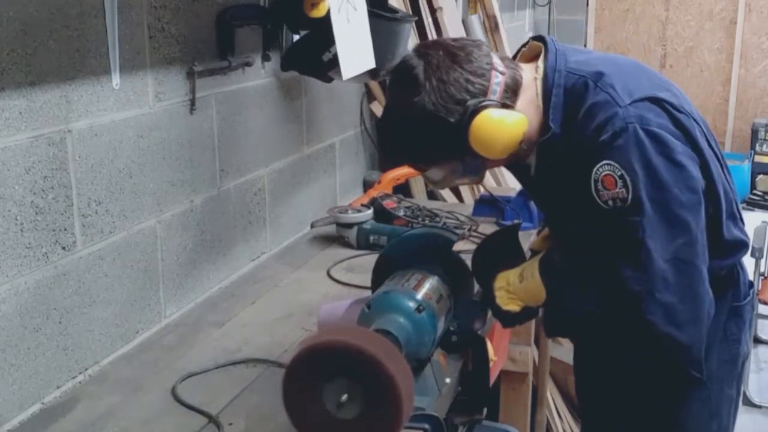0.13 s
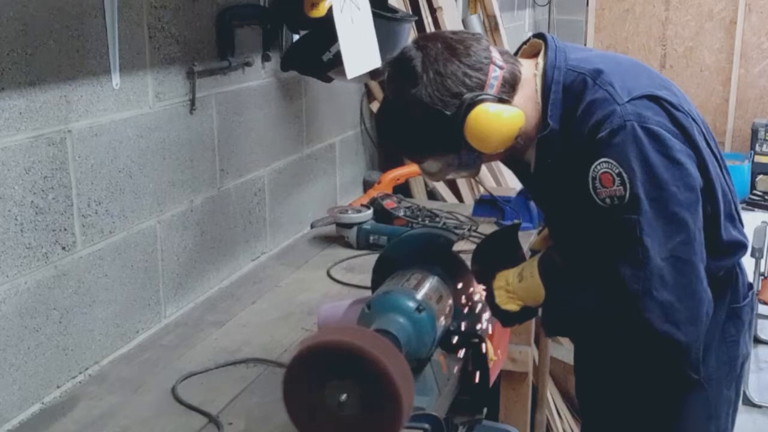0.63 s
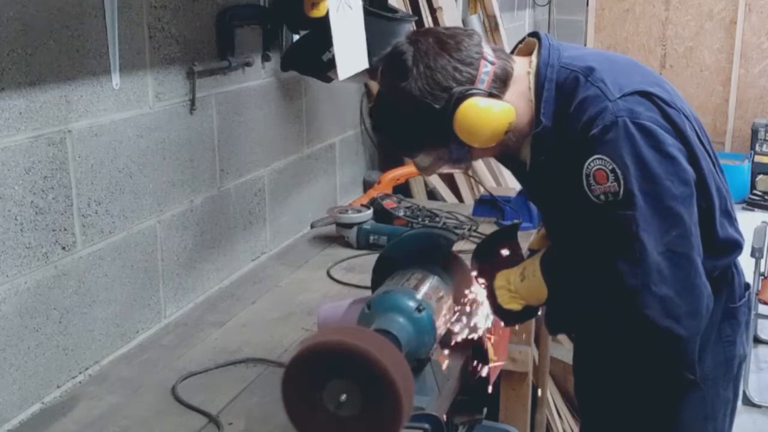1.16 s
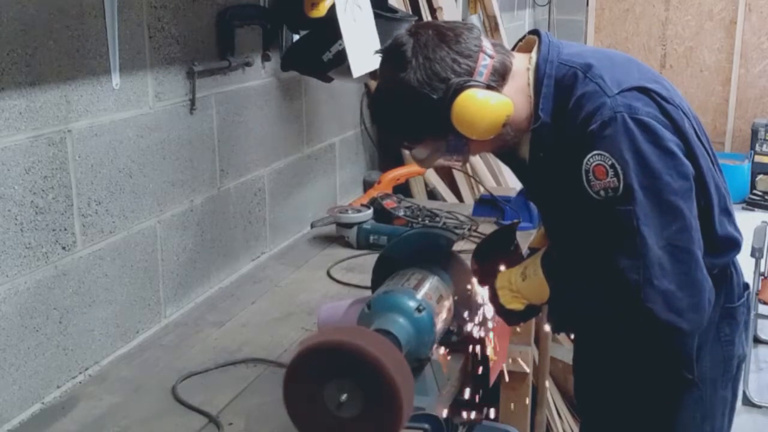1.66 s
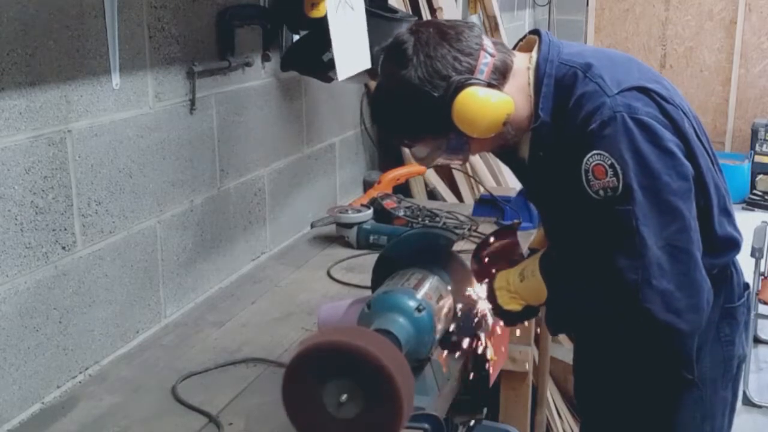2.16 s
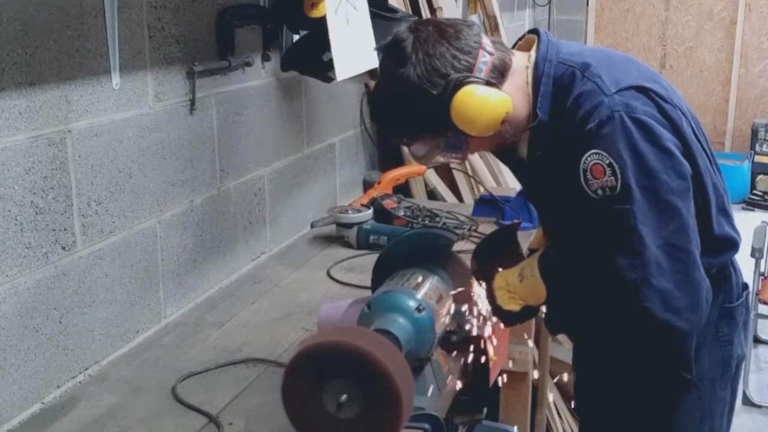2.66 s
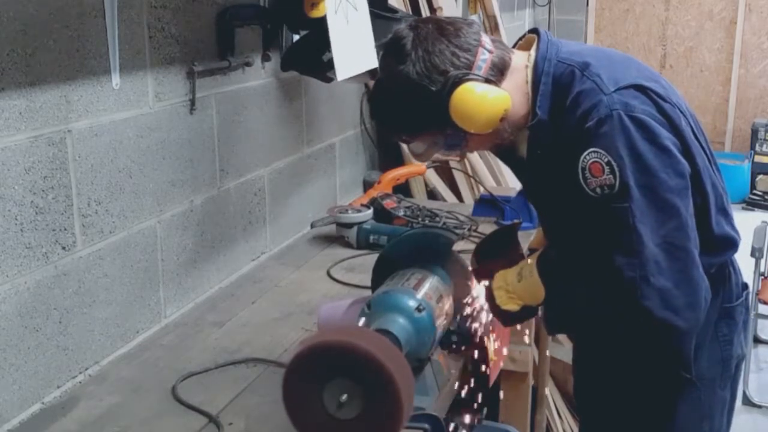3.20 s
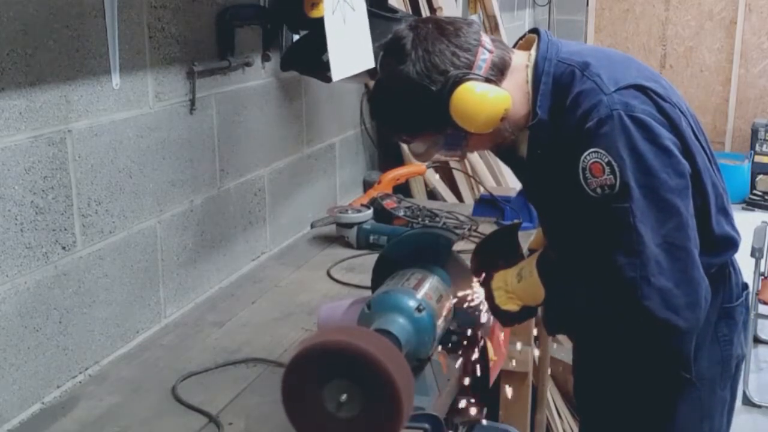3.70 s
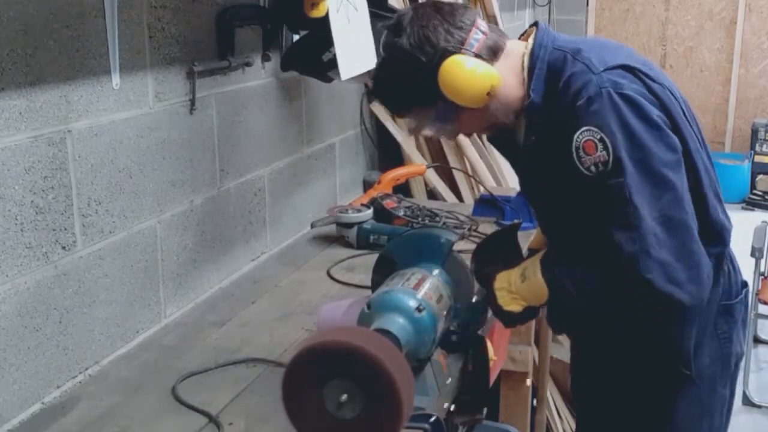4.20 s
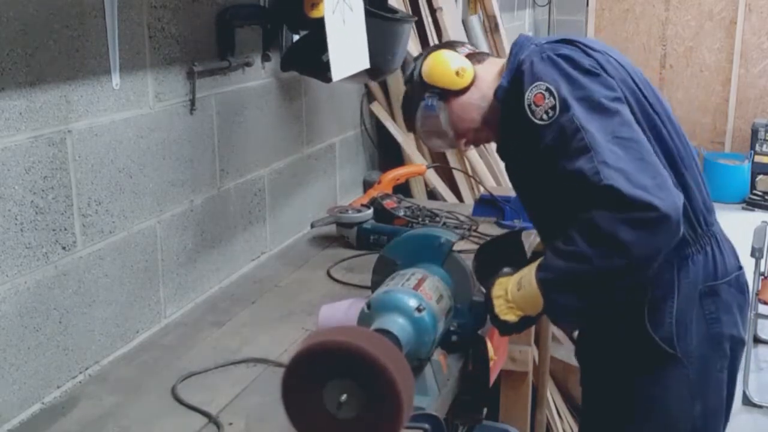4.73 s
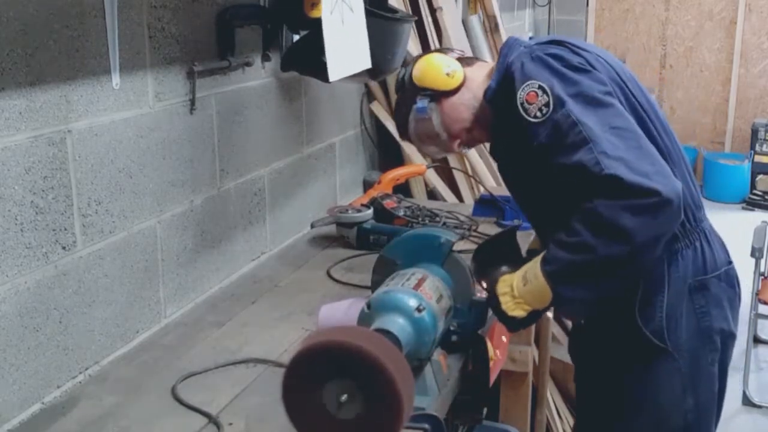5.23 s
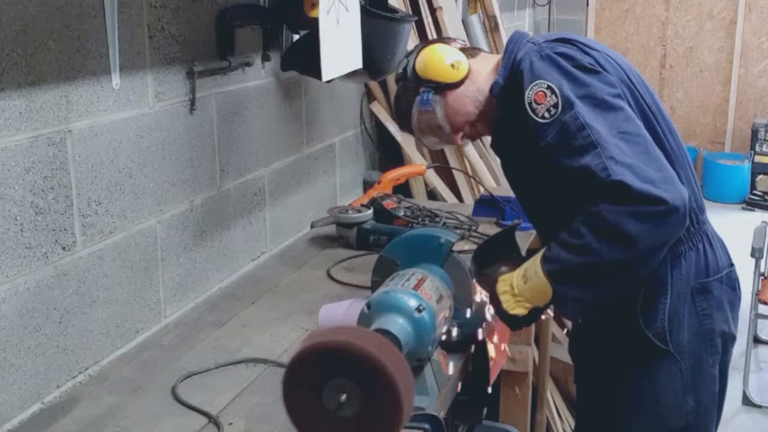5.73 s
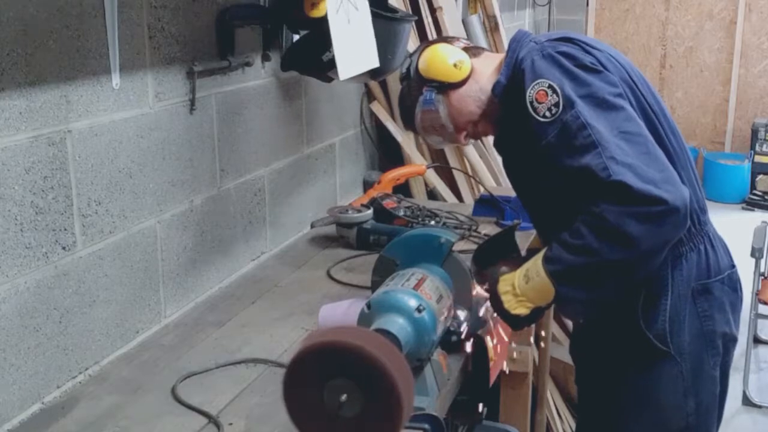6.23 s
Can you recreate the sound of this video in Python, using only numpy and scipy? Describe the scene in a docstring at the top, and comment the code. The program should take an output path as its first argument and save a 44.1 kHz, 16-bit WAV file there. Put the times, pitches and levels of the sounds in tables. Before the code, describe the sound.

In a hard-walled workshop, a bench grinder hums and whirrs throughout. The tail of one contact cuts off, then a steel piece meets the wheel in a long, bright, gritty rasp with wavering ringing and low bench judder. It lifts with quick brushes, leaving the motor alone, then grinds again, weaker in rasp toward the end. Stereo microphone a couple of metres away.

```python
"""Steel on a bench grinder

A steel piece is pressed against the wheel of a bench grinder in a block-walled workshop.
The grit comes round once a turn, so the rasp half repeats at shaft speed and rings the piece and the guard.
Waves worn into the rim make the guard sing. Load slows the motor; its unbalance shakes the bench and
beats against the mains hum. Windage and shop noise lie beneath, and the walls answer the grinding."""
import sys
import numpy as np
from scipy import signal
from scipy.fft import rfft, irfft, next_fast_len
from scipy.io import wavfile
from scipy.ndimage import uniform_filter1d, map_coordinates

SR = 44100
rng = np.random.default_rng(int(sys.argv[2]) if len(sys.argv) > 2 else 0)


def transcribe(u):
    """Save the signal u as a 16-bit wav file named by the first command-line argument.

    u: samples, shape (n,) or (channels, n), limited to [-1, 1]; the rate is SR.
    q: integer samples, one column per channel.
    """
    v = np.clip(np.atleast_2d(u).T, -1, 1)
    q = np.round(v * 32767).astype(np.int16)
    wavfile.write(sys.argv[1], SR, q)


def field_ratio(decibels):
    """Amplitude ratio for a level in dB (20 dB per decade); scalars and array-likes work."""
    return 10 ** (np.asarray(decibels, dtype=float) / 20)


N = 280917

# shaft speed, lower under load: time_s, speed_rev_per_s
SHAFT = [(0.0, 46.4), (0.26, 47.5), (0.44, 47.6), (0.73, 46.9), (0.94, 47.0), (1.07, 46.65), (1.33, 44.8),
         (1.58, 44.4), (2.02, 45.0), (2.57, 44.3), (3.16, 44.6), (3.48, 44.5), (3.89, 45.3), (4.59, 47.6),
         (5.13, 47.8), (5.66, 46.5), (6.19, 46.5), (6.37, 46.2)]
# piece on the wheel: start_s, end_s
TOUCH = [(-.1, .06), (.3245, 4.228), (5.081, 6.5)]
# stereo tilt of the spray and the air: pitch_hz, left_minus_right_db
LEAN = [(1500, 1), (4000, -7), (6500, -0.5), (8500, -1), (10500, 6.5), (15000, -1)]
# relative renewal of the grit per turn, scaled for each layer: one value (nepers at order 100) per grip
RENEWED = (0.3, 0.19, 0.35, 0.17, 0.27, 0.13)


def unit(x):
    """Scale to rms 1."""
    return x / np.sqrt(np.mean(x ** 2) + 1e-20)


def along(points, hz):
    """Read (Hz, value) points on a log frequency axis."""
    f, v = np.transpose(points)
    return np.interp(np.log(hz + 1), np.log(f + 1), v)


def curves(rows):
    """One value per sample for each column after the time."""
    s, *cols = np.transpose(rows)
    return [np.interp(np.arange(N) / SR, s, c) for c in cols]


def by_grip(values):
    """A setting that changes when the hold on the piece shifts, through six grips."""
    # start_s and end_s of each shift, in turn
    shift_times = [1.0, 1.1, 2.4, 2.55, 4.6, 4.7, 5.3, 5.45, 5.94, 5.97]
    return np.interp(np.arange(N) / SR, shift_times, np.repeat(values, 2)[1:-1])


def wobble(rate):
    """A smooth random curve, rate knots a second."""
    return map_coordinates(rng.standard_normal(400), [np.arange(N) * rate / SR])


def filtered(x, response):
    """Multiply the spectrum of x by a response of frequency."""
    m = next_fast_len(N + 8192)
    return irfft(rfft(x, m) * response(np.fft.rfftfreq(m, 1 / SR)), m)[..., :N]


def ring(force, modes, drift_db):
    """Resonances wavering in level, each with its own stereo tilt and lag; half-second rms held at 1."""
    out = np.zeros((2, N))
    for hz, width, db, lean_db, lag in modes:
        # two peaks in a row, each 1.55 times as wide: steep skirts leave dark gaps
        peak = np.hstack(signal.iirpeak(hz, hz / width / 1.55, SR))
        tone = field_ratio(db + drift_db * wobble(6)) * signal.sosfilt([peak, peak], force)
        late = np.roll(tone, round(lag * SR / hz))
        out += [field_ratio(lean_db / 2) * tone, field_ratio(-lean_db / 2) * late]
    power = (out ** 2).mean(0)
    return out / np.sqrt(uniform_filter1d(power, size=SR // 2))


def rim(turns, wear, orders, even):
    """The wheel profile under the piece: each turn keeps part of the last, fine grit least."""
    order = np.arange(769)
    count = 320  # turns
    shape = (count, len(order))
    fresh = rng.standard_normal(shape) + 1j * rng.standard_normal(shape)
    wear_by_turn = np.abs(np.interp(np.arange(count), turns, wear))
    kept = np.exp(-np.outer(wear_by_turn, order / 100))
    profile = [fresh[0]]
    for keep, new in zip(kept[1:], fresh[1:]):
        profile.append(keep * profile[-1] + np.sqrt(1 - keep ** 2) * new)
    profile = profile / np.abs(profile) ** even  # even 1 = every order equally strong
    in_range = (order >= orders[0]) & (order <= orders[1])
    track = irfft(profile * in_range).ravel()
    return unit(map_coordinates(track, [turns * 2 * order[-1]]))


def wheel_bite(turns):
    """The high spot of the wheel bites suddenly and lets go slowly; uneven lumps add to it."""
    # once-a-turn throb, strongest in the first grip: one depth_db per grip
    throb_db = by_grip((6.2, 1, .8, 2.5, 2.8, 3))
    after_first_touch = np.arange(N) / SR > TOUCH[0][1]
    high_spot = sum(np.sin(2 * np.pi * k * (turns + .81)) / k ** 1.3 for k in (1, 2, 3))
    bumps = rim(turns, 8 * np.abs(by_grip(RENEWED)), (2, 9), even=.3)
    bumps_db = 3
    return field_ratio(throb_db * high_spot * after_first_touch + bumps_db * bumps)


def piece_rasp(turns, bite):
    """Grit rings the modes of the piece, with a spray of noise between them; returns rasp and spray."""
    # modes of the piece: pitch_hz
    mode_hz = (2760, 3140, 3540, 4000, 4475, 4670, 5200, 5425, 5730, 6300, 6720, 7360, 7880, 8270, 8480,
               8870, 9170, 9560, 10120, 10770, 11410, 11580, 12270, 12530, 13050, 13520, 14040, 14730,
               15160, 15630)
    # for each mode: level_db in each of six grips, left_minus_right_db, right_lag_cycles
    mode_rows = [(-9, -1.5, 2, -5, 4, 10, -1.5, -0.17), (-10, 2, 0, -30, -24, 6, 4, -0.17),
                 (0, 2, 3.5, -1, 3, 6, 1.5, 0.12), (-1.5, 2.5, 2.5, -1, -0.5, 7, 10.5, 0.28),
                 (5, 6, 4, 5, 2, 10.5, 2.5, 0.14), (1, 4, 2, 0.5, 0.5, 6, -9.5, 0.06),
                 (-4, -6, -10, -17, -1, 1, 22.5, 0.4), (6, 10, 9.5, -1, 7, 10.5, -4.5, 0.25),
                 (4.5, 4, 3.5, -3, 3, 10.5, -13, 0.11), (-3, 1.5, 1, -2, 2, -10, 5, 0.14),
                 (-3, 3.5, 0, -3, -1.5, -3, -13, 0.19), (4.5, 4.5, 6.5, -1, -9, 3, -1, 0.18),
                 (-2, 0, 4.5, 1, 4.5, -9, 15, 0.37), (0, 1.5, 7.5, -5, -3.5, -12, 13, 0.23),
                 (-7, 3.5, 6, -16, -11, -16, 13, 0.35), (-1, 4, 0, 3, -9, -16, 13, 0.36),
                 (-10, 5.5, 4, -11, -2, -17, 12, 0.17), (0, 7, 6.5, -14, -11, -17, 2, 0.31),
                 (1, -4, -5, 11, -5, -13, 9, -0.48), (-4, 8, 13.5, 16, 11.5, 7.5, 5, 0.45),
                 (8, 11, 6.5, -6, 2, -1, 8, -0.41), (3, 4, 7, 10, 7, 9, 0.5, 0.34),
                 (2, 2, 8.5, 9, 8.5, 10, -14.5, 0.37), (9.5, 8, 6, 12, 8.5, 9.5, 4, 0.27),
                 (8.5, 8, 7, -10, 9, 13, 0, 0.46), (1, -5, -9, 11, -5, 1, 3, -0.24),
                 (2, 6, 10.5, 0, -8, 6, -4, 0.36), (6.5, 10.5, 9, 6, 0, 9, 3, 0.49),
                 (3.5, -6, -3, 3, 5, 8, 4, -0.5), (-9, -1.5, 6, -7, -16, -5, 8, 0.42)]
    # close pairs of modes that merge into broader ones: pitch_hz
    merged_hz = (4670, 5730, 6720, 10770)
    # relative spectrum of the rasp between the modes: pitch_hz, level_db per Hz
    spray_tone = [(880, 6), (1500, -15), (2630, -19), (2980, -13.5), (3350, -8.5), (3780, -13.5),
                  (4170, -10), (4900, -5.5), (5600, -19.5), (6030, -7.5), (6500, -13.5), (7100, -10),
                  (7700, -13), (10400, -5), (15800, -14)]
    # level of the spray under 9 kHz: one gain_db per grip
    low_spray_db = by_grip((-2, 0.5, -0.5, -5.5, 0, 1))

    slide = np.abs(by_grip(RENEWED))
    grit = [unit(bite * rim(turns, .36 * slide, (30, 400), even=.45)) for _ in range(2)]
    modes = []
    for hz, (*db, lean_db, lag) in zip(mode_hz, mode_rows):
        width = 58 + hz / 1000  # Hz, growing with pitch
        if hz in merged_hz:
            width *= 1.9
        modes.append((hz, width, by_grip(db), lean_db, lag))

    tilt = lambda hz: np.outer([.5, -.5], along(LEAN, hz))
    spray = unit(filtered(np.array(grit), lambda hz: field_ratio(along(spray_tone, hz) + tilt(hz))))
    spray = spray + (field_ratio(low_spray_db) - 1) * filtered(spray, lambda hz: hz < 9000)
    rasp = unit(ring(grit[0], modes, drift_db=2.0) + field_ratio(-3) * spray)
    return rasp, spray


def singing(turns):
    """Waves in the rim give tones that glide with the shaft, waver and break up as the piece slides."""
    # waves worn into the rim: cycles per turn
    wave_orders = (7, 8, 16, 20, 22, 23, 24, 25, 26, 27, 29, 30, 32)
    # for each wave, the relative song of the guard: level_db in each of six grips, right_lag_cycles
    wave_rows = [(-24, -18.5, -21, -36, -21, -25, 0.014), (-28, -23.5, -22, -32, -30.5, -20.5, 0.05),
                 (-40, -33, -18, -25, -23, -24.5, 0.14), (-32, -17.5, -29, -18, -27, -20, 0.17),
                 (-15, -48, -28, -6.5, -11.5, -13, 0.26), (-9.5, -45, -18.5, -8, -3.5, -8, 0.23),
                 (-2.5, -12.5, -6.5, -8, -6, -9.5, 0.32), (-10, 3, -4, -15, -11, -8.5, 0.28),
                 (-29, -18, -11, -27, -27, -17, 0.97), (-17, -8, -16, -11, -10, -28, 0.34),
                 (-16, -16, -16.5, -12, -18, -24, 0.03), (-6.5, -9, -14, -26, -19, -24, 0.059),
                 (-12.5, -8, -15, -25, -36, -35, 0.015)]
    # timing scatter of the waves: one value (turns) per grip
    scatter = by_grip((.003, .002, .0035, .004, .003, .0035))
    song = 0
    for k, (*db, lag) in zip(wave_orders, wave_rows):
        level = field_ratio(by_grip(db) + 2.4 * wobble(8))
        cycles = k * (turns + scatter * wobble(18)) + rng.uniform()
        song = song + level * np.sin(2 * np.pi * (cycles - np.array([[0], [lag]])))
    return song


def guard_ring(turns, bite):
    """The coarse rim shape, which wears slowly, rings the wheel guard and rest; the rim waves sing in it."""
    # modes of the guard and rest: pitch_hz, width_hz, relative level_db, left_minus_right_db, right_lag_cycles
    guard_modes = [(838, 400, -21.5, 9.5, 0.36), (1125, 157, -9, 7, 0.16), (1415, 154, -4, 2, -0.2),
                   (1521, 34, -16.5, -34, 0.16), (1902, 120, -8.5, 0, 0.05), (2244, 345, -8, 0.5, 0.17)]
    lumps = rim(turns, .6 * np.abs(by_grip(RENEWED)), (3, 60), even=.5)
    ringing = ring(lumps * bite ** .5, guard_modes, drift_db=1.8)
    return field_ratio(-5.0) * ringing + field_ratio(2.5) * singing(turns) * bite ** (1 / 4)


def bench_judder(turns):
    """The rest rattles and drives the bench top, so the bench keeps less of each turn."""
    # modes of the bench top: pitch_hz, width_hz, relative level_db, left_minus_right_db, right_lag_cycles
    bench_modes = [(148, 61, 1.6, 4, 0.005), (239.3, 52, 2.7, 3, 0.03), (356.7, 72, 0.31, 12.6, 0.021),
                   (435, 88, -0.8, 1.5, 0.19), (736, 330, -2.6, 1.5, 0.03)]
    judder = rim(turns, 4 * np.abs(by_grip(RENEWED)), (3, 30), even=.55)
    return ring(judder, bench_modes, drift_db=0.0)


def grinding(turns):
    """Contact and hand pressure set the levels of the rasp, the guard and the bench."""
    # pressure of the hand, one table per stretch: the dying end of an earlier contact, then two long contacts:
    # time_s, rasp level_db before the mix
    pressure = [
        [(0, -23), (.06, -40)],
        [(0.33, -26), (0.52, -22.5), (0.73, -23), (0.74, -25.5), (1.21, -18), (1.39, -22), (1.64, -18.5),
         (1.86, -21), (2.39, -21), (2.54, -17), (2.72, -21.5), (2.84, -18.5), (3.23, -21), (3.31, -17.5),
         (3.38, -20), (3.68, -19), (3.74, -22), (3.83, -18.5), (3.85, -20), (3.95, -18), (4.22, -30)],
        [(5.085, -23), (5.155, -25), (5.295, -20.5), (5.697, -19.5), (5.775, -24), (5.851, -18.5),
         (5.935, -22.5), (5.97, -26), (6.135, -29.5), (6.225, -25), (6.365, -26.5)],
    ]
    # guard ring, one table per long contact: time_s, level_db before the mix
    guard_level = [
        [(0.34, -44), (0.68, -32.5), (0.88, -38), (1.21, -30.5), (1.61, -33.5), (1.76, -34.5), (2.89, -31.5),
         (3.0, -33), (3.27, -32), (3.35, -33), (4.16, -34), (4.21, -42)],
        [(5.1, -41.5), (5.124, -41.5), (5.46, -30.5), (5.948, -32), (5.956, -34), (6.36, -29.5)],
    ]
    # the piece brushes the wheel as it leaves: middle_s, length_s, level_db before the mix
    grazes = [(4.242, 0.016, -26), (4.292, 0.041, -29.5)]

    t = np.arange(N) / SR
    rasp_db, = curves(np.vstack(pressure))
    guard_db, = curves(np.vstack(guard_level))
    contact = sum((t > start) & (t < end) for start, end in TOUCH) * 1.
    touching = uniform_filter1d(contact, size=220)  # 5 ms fades
    brushing = 0
    for middle, length, db in grazes:
        brushing = brushing + field_ratio(db) * np.cos(np.pi * np.clip((t - middle) / length, -.5, .5)) ** 2

    bite = wheel_bite(turns)
    rasp, spray = piece_rasp(turns, bite)
    guard = field_ratio(guard_db) * guard_ring(turns, bite)
    bench_db = -46.5 + 0.94 * (rasp_db + 19.5)  # follows pressure less than the rasp
    bench = field_ratio(bench_db) * bench_judder(turns)
    return touching * (field_ratio(rasp_db) * rasp + guard + bench) + brushing * (rasp + spray) / 2


def motor(turns):
    """Shaft orders follow the speed; mains tones hold their pitch and change level as speed is lost."""
    # unbalance and ovality, either side of a bench resonance:
    # shaft_order, level_db before stereo tilt, change_db per rev/s lost
    shake_orders = [(1, -39.5, -3), (2, -47.5, 3), (4, -66, 3)]
    # mains hum: pitch_hz, level_db before stereo tilt, change_db per rev/s lost
    mains = [(100, -44.5, -0.5), (199, -52.5, -2.5), (409.6, -63, -0.5), (499, -62.5, 1.5), (596, -64, 2.5)]
    # whine: shaft_order, level_db before the two blends below
    whine_orders = [(3.05, -58.5), (20.77, -58.5), (22.2, -59), (24.07, -60.5), (24.85, -59.5)]

    free_speed = 47.51  # rev/s
    lost = free_speed - curves(SHAFT)[0]
    t = np.arange(N) / SR

    def sine(cycles, db):
        return np.sqrt(2) * field_ratio(db) * np.sin(2 * np.pi * (cycles + rng.uniform()))

    def whine(rows):
        return sum(sine(k * turns, db + 1.9 * wobble(6.7)) for k, db in rows)

    shake = sum(sine(k * turns, db + gain * lost + 0.31 * wobble(3.6)) for k, db, gain in shake_orders)
    hum = sum(sine(hz * t, db + sag * lost) for hz, db, sag in mains)
    # the turning rotor splits off a tone one shaft order under the hum
    slip = sine(mains[0][0] * t - turns, -75 + 2.1 * wobble(4.7))
    common = shake + hum + slip + 0.95 * whine(whine_orders)
    opposed = whine(whine_orders[1:])  # opposite polarity left and right
    return field_ratio([[.9], [-.9]]) * common + 1.2 * np.array([opposed, -opposed])


def air():
    """Windage of the wheels and shop noise: alike in the bass, nearly unrelated in the treble."""
    # relative spectrum of idling wheels and shop: pitch_hz, level_db per Hz
    air_tone = [(41, -38), (70, -8), (151, -17), (203, -20), (273, -18.5), (792, -24), (1160, -17.5),
                (1280, -28.5), (2520, -34.5), (3160, -31.5), (4200, -36.5), (15800, -30.5)]
    # left-right likeness: pitch_hz, correlation
    likeness = [(60, 0.79), (240, 0.84), (950, 0.24), (3770, -0.13), (15000, 0.088)]

    def mid_side(hz):
        angle = np.arccos(np.clip(along(likeness, hz), -1, 1)) / 2
        return field_ratio(along(air_tone, hz)) * [np.cos(angle), np.sin(angle)]

    mid, side = filtered(rng.standard_normal((2, N)), mid_side)
    pair = np.array([mid + side, mid - side])
    pair = filtered(pair, lambda hz: field_ratio(np.outer([.5, -.5], along(LEAN, hz))))
    treble = filtered(pair, lambda hz: hz > 1300)
    return field_ratio(-50) * pair / treble.std()  # level of the part above 1300 Hz


def walls(x):
    """Noise tail in which each frequency of the shop's answer dies at its own speed."""
    # reverberation: pitch_hz, t60_s
    decay = [(300, 0.061), (3000, 0.67), (12000, 0.22)]
    hz, t, z = signal.stft(rng.standard_normal((2, SR // 2)), SR, nperseg=256)
    fade = field_ratio(-60 * t / along(decay, hz)[:, None])
    tail = signal.istft(z * fade, SR, nperseg=256)[1]
    return signal.fftconvolve(x, tail / np.linalg.norm(tail[0]), axes=1)[:, :N]


def scene():
    """Grinder at a couple of metres: direct grinding, its answer from the walls, motor and air."""
    turns = np.cumsum(curves(SHAFT)[0]) / SR
    direct = grinding(turns)
    answer = field_ratio(-7.5) * walls(direct)
    return field_ratio(2.5) * direct + answer + motor(turns) + air()


def top_cut(x):
    """Nothing passes above the cut-off."""
    return signal.sosfilt(signal.butter(12, 16840, fs=SR, output="sos"), x)


def record(dry):
    """Limit the band to 15740 Hz and deliver the finished mix."""
    mix = filtered(dry, lambda hz: hz < 15740)
    return top_cut(mix)


dry = scene()
out = record(dry)
transcribe(out)
```